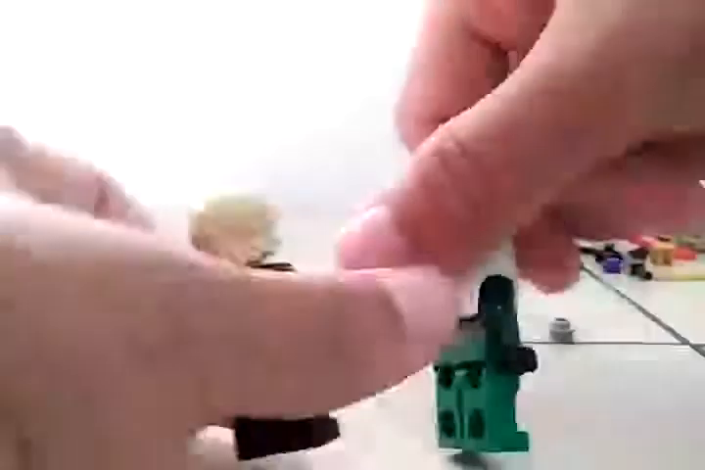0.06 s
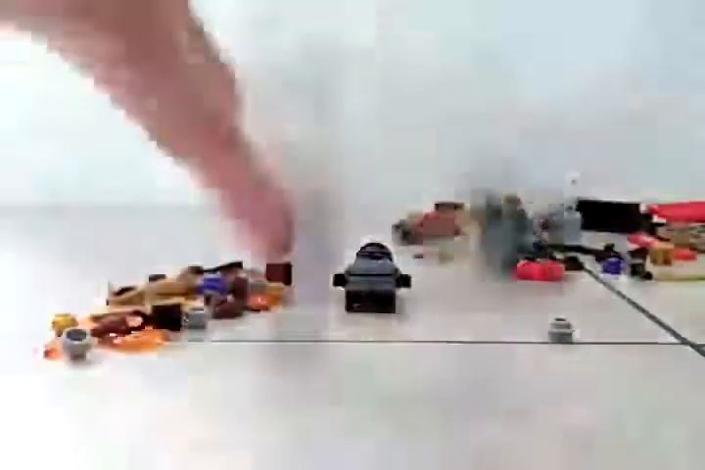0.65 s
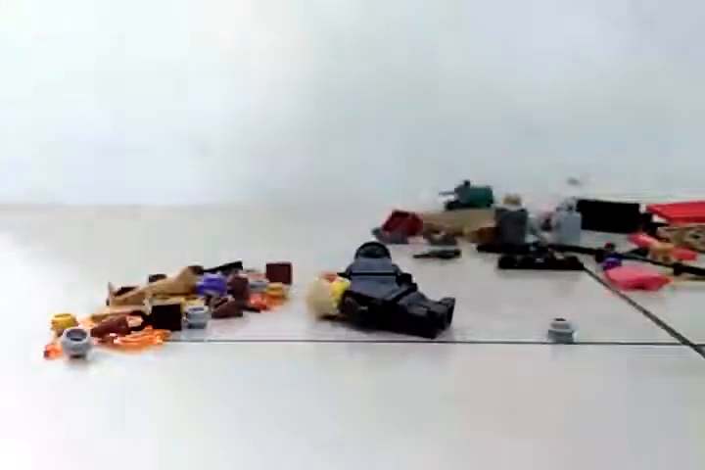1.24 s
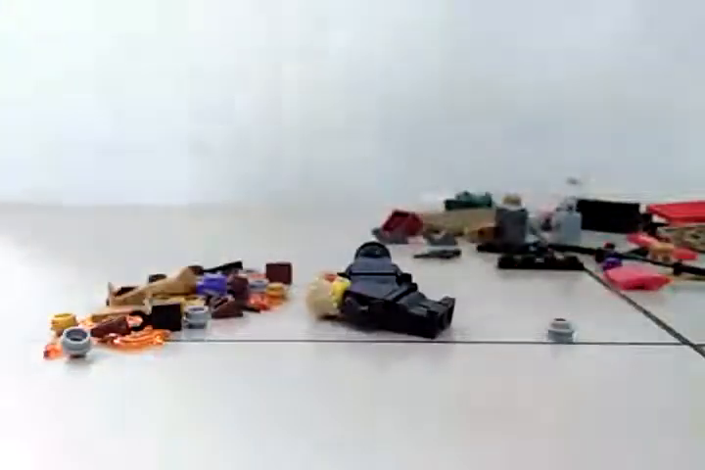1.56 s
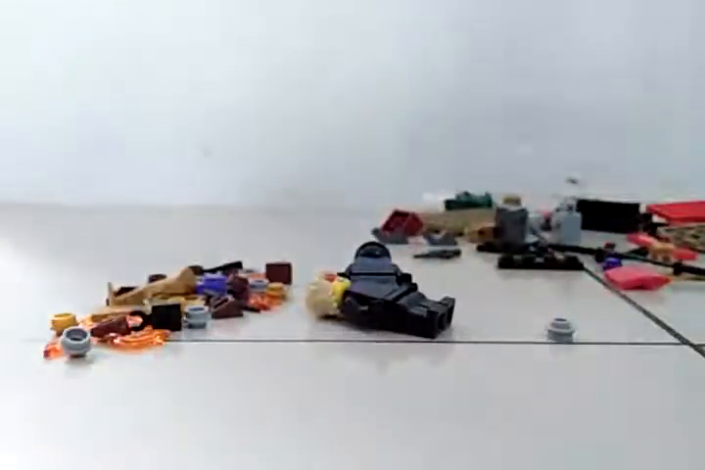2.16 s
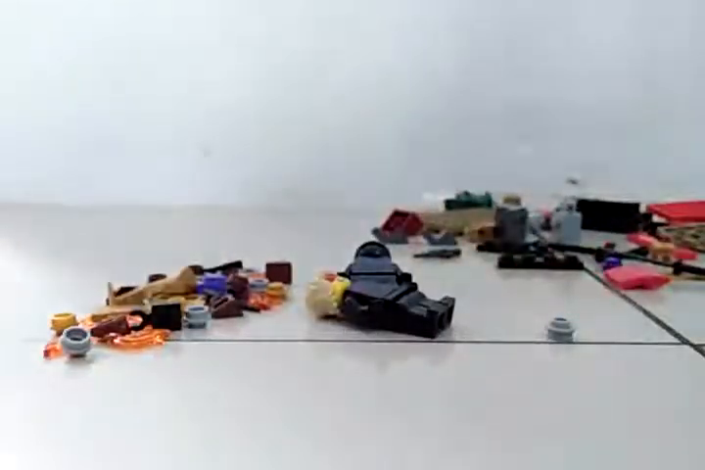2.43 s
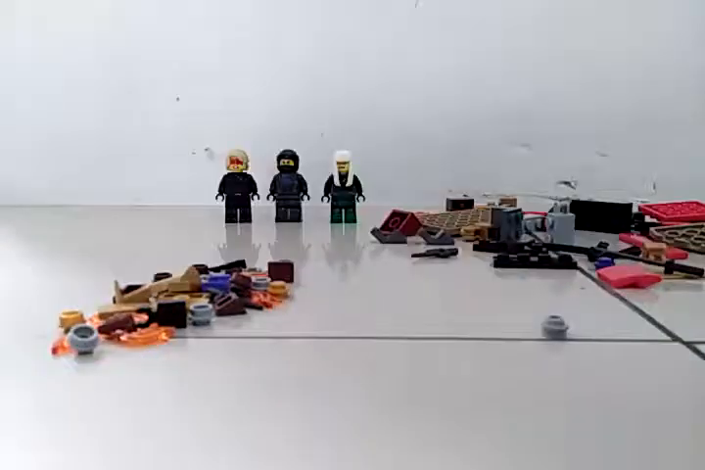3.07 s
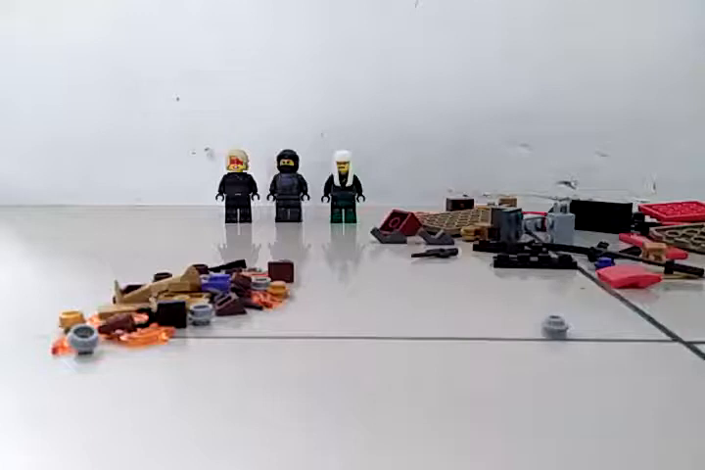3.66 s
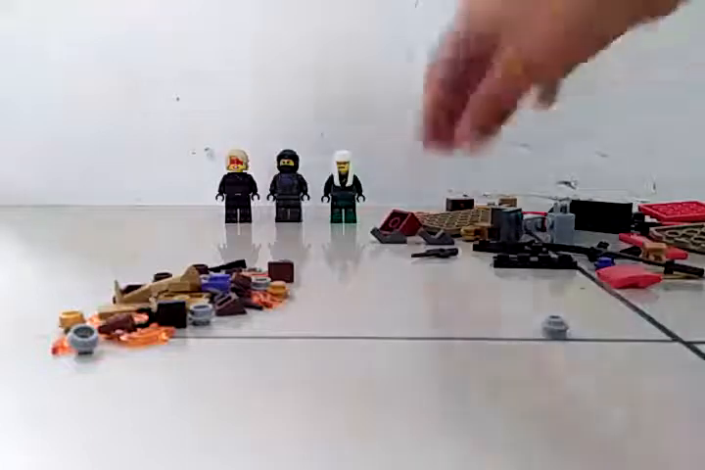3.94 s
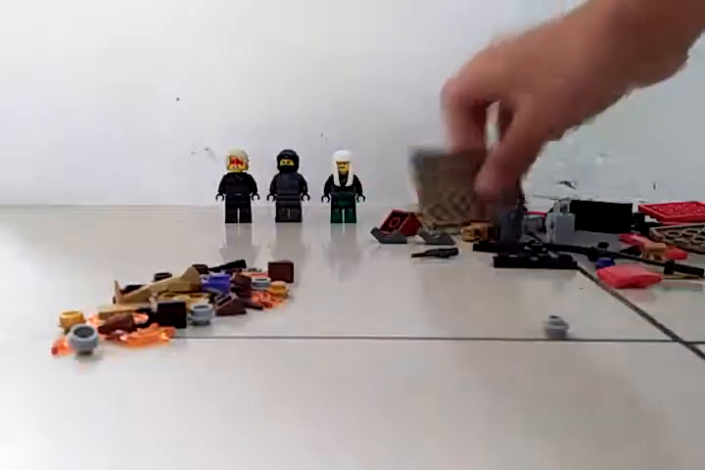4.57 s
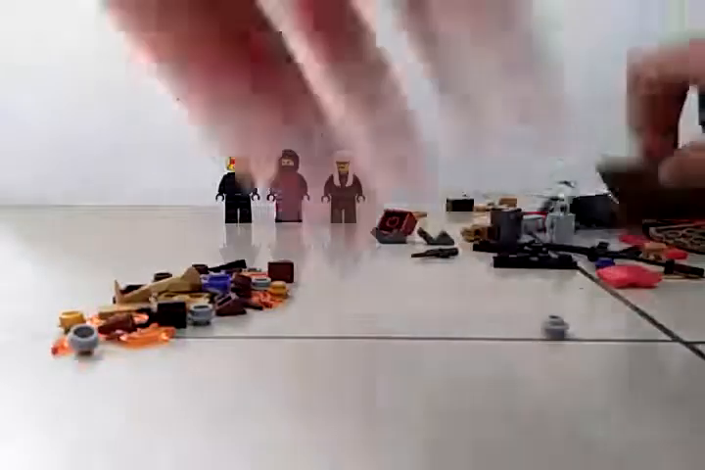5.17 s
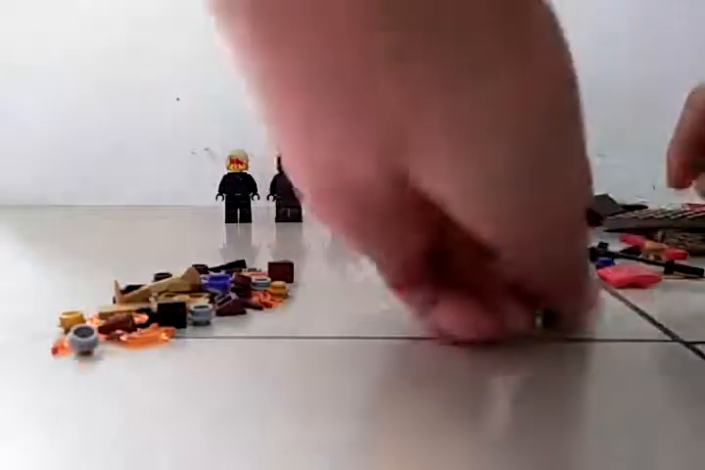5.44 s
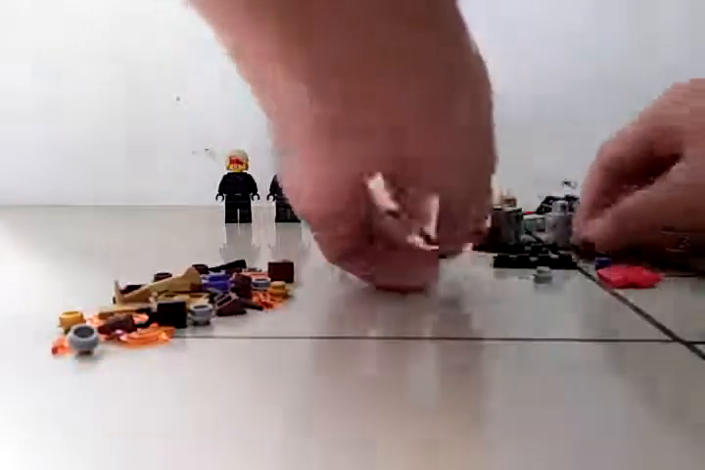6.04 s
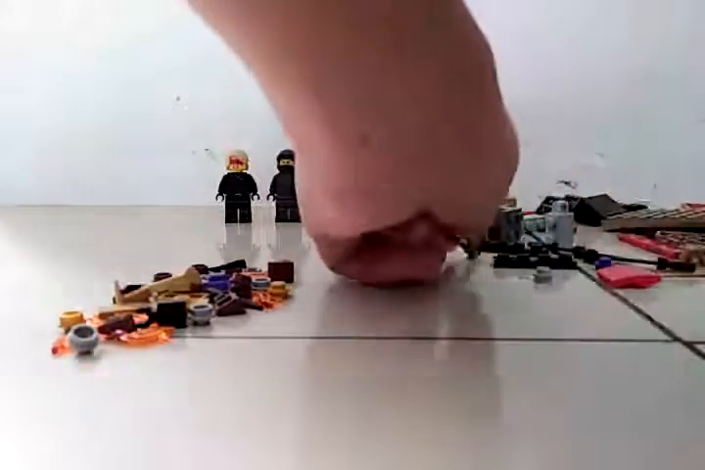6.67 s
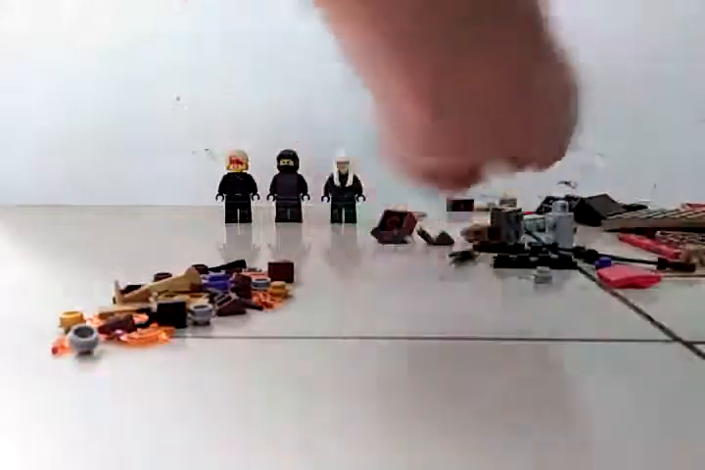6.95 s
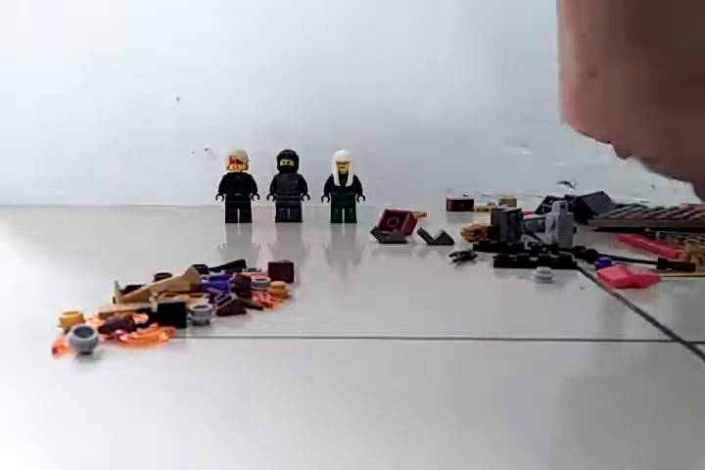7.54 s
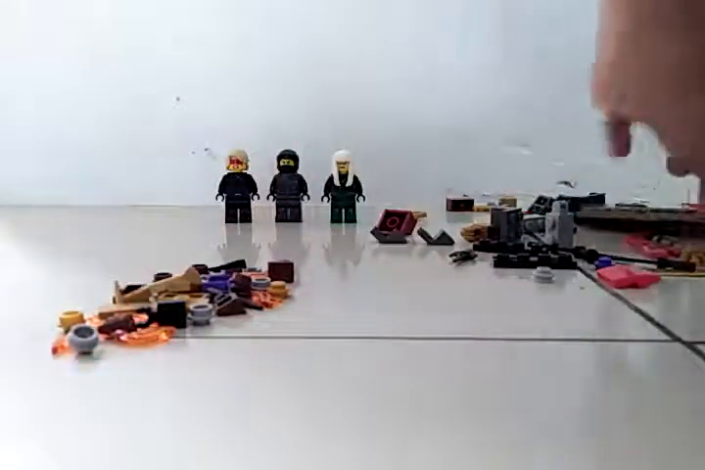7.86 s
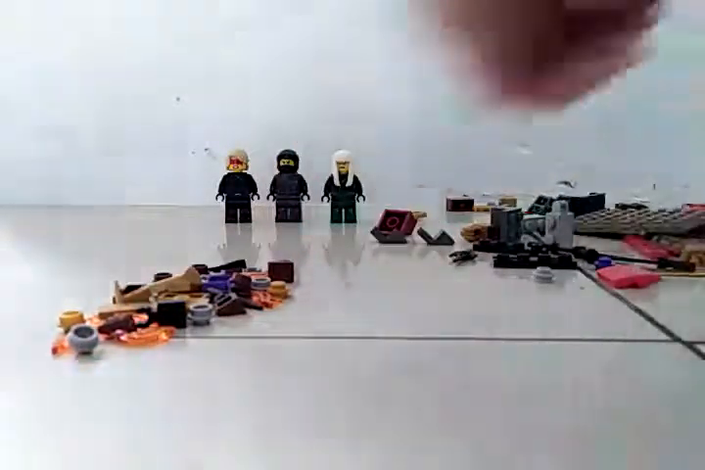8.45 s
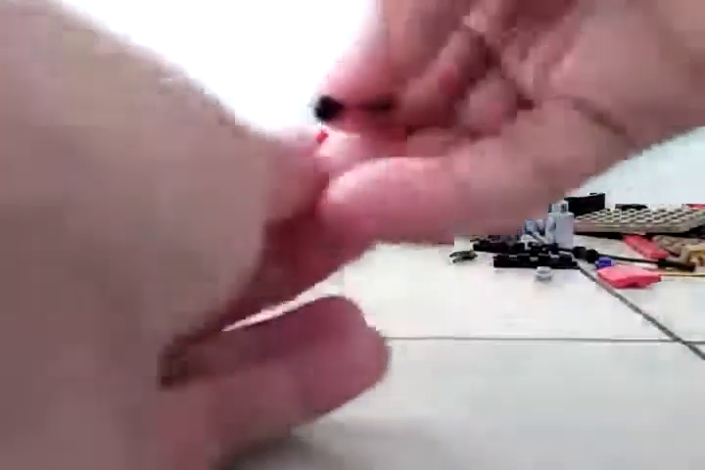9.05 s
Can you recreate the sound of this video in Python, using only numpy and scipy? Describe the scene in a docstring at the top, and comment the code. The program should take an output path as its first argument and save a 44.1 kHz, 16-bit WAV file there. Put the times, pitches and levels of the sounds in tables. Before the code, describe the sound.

A faint low drone fills a bare, tiled room, with the microphone close to a pile of plastic toy bricks. From about 0.4 to 1.4 seconds, figures topple and bricks crack together in a bright clatter, ringing briefly in the room. A faint far-off rush passes near 2.7 seconds, and soft low bumps come and go. Around 3.5 seconds, fingers brush over plastic and a hollow piece taps lightly. A block clicks sharply at 4.2 seconds, then a flat plate scrapes over the tiles from 4.4 to 4.7. Pieces rattle and slide from 5 seconds, peaking in the loudest snap at about 5.4. After a quiet stretch with a few dull bumps, hands rummage from 7.4 seconds with small ticks, clicks and rubs. A long piece is put down with a little bounce at 8.4 seconds, leaving soft bumps and the drone.

```python
"""A bare, hard room with a tiled floor; a phone microphone near a pile of plastic bricks, a low drone behind.
In the first second hands knock toy figures over: each contact is a few milliseconds of chatter that rings
the hollow piece. Soft bumps and brushing fingers follow, and a far-off rush passes. At 4.4 s a flat building
plate scrapes over the tiles and is lifted out of the pile; from 7.4 s the hands rummage, then put a long
piece down. The room rings on behind the clicks; the phone's noise suppressor shortens the bright tails."""
import sys
import numpy as np
from scipy import signal
from scipy.fft import rfft, irfft, next_fast_len
from scipy.io import wavfile
from scipy.ndimage import uniform_filter1d

SR = 44100
rng = np.random.default_rng(int(sys.argv[2]) if len(sys.argv) > 2 else 0)


def dump_mix(stems):
    """Bounce the given channels to the path in sys.argv[1] as a 16-bit WAV at rate SR."""
    frames = np.atleast_2d(stems).T  # one column per channel
    limited = np.clip(frames, -1, 1)  # hard clip at full scale
    pcm = np.round(limited * 32767).astype(np.int16)
    wavfile.write(sys.argv[1], SR, pcm)


N = 410571
TIME = np.arange(N) / SR


def undb(db):
    """Decibels to gain."""
    return 10 ** (np.asarray(db) / 20)


def unit(x):
    """Scale to rms 1."""
    return x / np.sqrt(np.mean(x ** 2) + 1e-30)


def band(x, lo, hi, order=4):
    """Causal band-pass, edges in Hz."""
    sos = signal.butter(order, [lo, min(hi, SR / 2 - 100)], "band", fs=SR, output="sos")
    return signal.sosfilt(sos, x)


def colour(x, points):
    """Shape a spectrum by points of f/Hz, level/dB."""
    hz, db = np.transpose(points)
    size = next_fast_len(N, True)
    f = np.maximum(np.arange(size // 2 + 1) * SR / size, 1)
    return irfft(rfft(x, size) * undb(np.interp(np.log(f), np.log(hz), db)), size)[:N]


def wander(rate_hz):
    """Smooth random drift with a spread near 1."""
    hold = int(SR / rate_hz)
    steps = np.repeat(rng.standard_normal(N // hold + 1), hold)
    return 1.3 * uniform_filter1d(uniform_filter1d(steps, hold), hold)[:N]


def swells(rows):
    """Gain that grows exponentially to each peak and dies away again."""
    return sum(undb(db) * np.exp(-np.maximum((peak - TIME) / rise, (TIME - peak) / fall))
               for peak, rise, fall, db in rows)


def add(track, start_s, sound):
    """Mix a sound into a track."""
    i = int(start_s * SR)
    track[i:i + len(sound)] += sound[:N - i]


# Spectrum of the room tone: f/Hz, level/dB (levels in all tables are relative)
TONE_COLOUR = [(21, -36), (35, -14), (87, -10.5), (180, -4), (214, -17), (297, 1), (374, -19), (437, -7.5),
               (655, -5), (735, -0.5), (874, -6), (944, -2), (1080, -4.5), (1310, -8), (2000, -16.5),
               (3500, -24.5), (4550, -67.5), (7700, -120)]
# Course of the drone: t/s, level/dB
DRONE_LEVEL = [(0.0, -68), (0.31, -68), (1.27, -71), (2.23, -66), (3.08, -65), (3.5, -77.5), (4.38, -78),
               (4.59, -75.5), (5.01, -71), (6.27, -73.5), (6.51, -68), (7.65, -73.5), (8.32, -77.5),
               (8.74, -68.5), (9.31, -78)]
# Surges of rumble: peak t/s, rise/s, fall/s, level/dB
SURGES = [(0.15, 0.24, 0.17, -66.5), (0.4, 0.41, 0.69, -66.5), (2.35, 0.21, 0.1, -72),
          (3.0, 0.53, 0.29, -66.5), (6.48, 0.1, 0.6, -66)]
def room_tone():
    """The room's low background: surging rumble and an uneven drone that flicker together."""
    noise = colour(rng.standard_normal(N), TONE_COLOUR)
    flicker = wander(18)
    rumble = unit(band(noise, 43, 130)) * undb(2.6 * flicker + 2.26 * wander(26))
    drone = unit(band(noise, 150, 420) + 0.51 * band(noise, 300, 320, order=1)) * undb(3.2 * flicker)
    rumble_gain = undb(-80) + undb(-4) * swells(SURGES)
    drone_gain = undb(np.interp(TIME, *np.transpose(DRONE_LEVEL)) - 0.77)
    return rumble_gain * rumble + drone_gain * drone


# Broad swells of the rush: peak t/s, rise/s, fall/s, level/dB
RUSH_SWELLS = [(0.4, 1, 1, -74), (2.6, 0.26, 0.7, -81), (3.25, 0.23, 0.37, -71), (9.2, 0.94, 0.38, -84)]
# Edges of its bands: f/Hz
RUSH_BANDS = [350, 600, 820, 1050, 3800]
def distant_rush(rest_db=-71.5, flicker_db=2.2):
    """A rush far from the microphone that swells and flickers band by band."""
    air = np.zeros(N)
    for lo, hi in zip(RUSH_BANDS, RUSH_BANDS[1:]):
        noise = colour(rng.standard_normal(N), TONE_COLOUR)
        air += band(noise, lo, hi) * undb(flicker_db * wander(15))
    return (undb(rest_db) + swells(RUSH_SWELLS)) * unit(air) * undb(1.6 * wander(9))


# Spells of hum: start t/s, end t/s, level/dB
HUMS = [(0.0, 0.65, -64.5), (2.238, 2.5, -74.5), (6.3, 6.9, -72.5)]
def hum(hz=85, fade_s=0.08):
    """A low, slightly wavering hum comes and goes."""
    tone = unit(np.sin(2 * np.pi * np.cumsum(hz + 0.6 * wander(3.5)) / SR))
    return tone * sum(undb(db) * np.clip(np.minimum(TIME - start, end - TIME) / fade_s, 0, 1)
                      for start, end, db in HUMS)


def ring(modes, detune, crack=0, crack_s=1, size=4096):
    """One tap on a piece: clear modes that differ from spot to spot, and a crack of countless damped ones."""
    hz, db, t60 = np.transpose(modes)[:, :, None]
    t = np.arange(size) / SR
    pitch, strength = rng.standard_normal((len(modes), 2)).T[:, :, None]
    waves = np.sin(2 * np.pi * hz * (1 + detune * pitch) * t) * np.exp(-np.log(1000) * t / t60)
    polarity = rng.choice([-1, 1], (len(modes), 1))
    clear = np.sum(polarity * undb(db + 2 * strength) * waves / np.sqrt(t60), axis=0)
    dense = band(rng.standard_normal(size), 1500, 25000, order=2) * np.exp(-t / crack_s)
    return unit(clear) + crack * unit(dense)


# Edges of the knock, clack, snap and tick registers: f/Hz
REGISTERS = [600, 2400, 7000, 11000, 15000]
# Each piece's share in them: knock/dB, clack/dB, snap/dB, tick/dB
BALANCE_DB = {"brick": (-17.5, -7, 1.5, -9), "plate": (0, -3.5, -2, -9), "beam": (-7.5, -9, 1.5, -4),
              "large brick": (-24.5, -9.5, -1, -3), "block": (-26.5, -8.5, -6, -14.5),
              "hollow": (-12, -10, -21.5, -18), "chip": (-42, -7, 6, 16), "clack": (2.5, -10, -5, -1.5),
              "figure": (-14.5, -16, 0, -3.5), "stud": (-7.5, -1, 0.5, -1.5),
              "slat": (-8, -9.5, 0.5, -14.5)}
DULL_TILT = (1, 0.52, -0.016, -0.17)  # dB in each register for 1 dB of dullness
def blows(kind, hits, modes, detune, crack, crack_s, chatter, build, size=4096):
    """A first contact, then chatter that builds and dies; a flat landing is duller than one on a corner."""
    out, t = np.zeros(N), np.arange(size) / SR
    attack = int(0.008 * SR)
    times, strength, dullness, chatter_times = np.transpose(hits)
    sounds = []
    for chatter_s in chatter_times:
        age = t / chatter_s
        rattle = rng.standard_normal(size) * rng.random(size) * np.exp(-age) * (1 - np.exp(-age / build))
        contact = (t == 0) + chatter * rattle / np.linalg.norm(rattle)
        sounds.append(signal.fftconvolve(contact, ring(modes, detune, crack, crack_s))[:size])
    shaped = 0
    for lo, hi, db, tilt in zip(REGISTERS, REGISTERS[1:], BALANCE_DB[kind], DULL_TILT):
        register = band(np.array(sounds), lo, hi)
        gain = undb(strength + db + tilt * dullness) / register[:, :attack].std(axis=1)
        shaped = shaped + register * gain[:, None]
    for start, sound in zip(times, shaped):
        add(out, start, sound)
    return out


def piece(kind, hits, modes, detune, crack, crack_s, chatter, build, direct_db, room_db, room_detune):
    """Two paths: straight to the microphone, and all round into the room with each mode a cluster of three."""
    direct = blows(kind, hits, modes, detune, crack, crack_s, chatter, build)
    all_round = blows(kind, hits, list(modes) * 3, room_detune, 0.7 * crack, crack_s, 0.59 * chatter, build)
    return np.array([undb(direct_db) * direct, undb(room_db) * all_round])


# Figure blows: t/s, level/dB, dullness/dB, chatter/s
FIGURE_HITS = [(0.4060, -53, 14.5, 0.001), (0.4213, -43, 0, 0.002), (0.4427, -61.5, 23, 0.0026),
               (0.7840, -43, 3.5, .0018), (0.9283, -39, 3, .004)]
# Figure modes: f/Hz, level/dB, t60/s
FIGURE_MODES = [(740, -7, 0.049), (894, 6.5, .055), (1010, -1.5, 0.027), (1910, -5, 0.013),
                (2420, -1, 0.016), (2830, -4.5, .02), (4200, 1, 0.0073), (7000, -12, 0.00814),
                (9590, 15.5, .009), (10600, 1.5, .008), (11550, -0.5, .006)]
def figures():
    """Toy figures tap the tiles and topple."""
    return piece("figure", FIGURE_HITS, FIGURE_MODES, detune=0.042, crack=0.5, crack_s=0.0008,
                 chatter=2.8, build=0.2, direct_db=-2, room_db=-7, room_detune=0.0495)


# Brick blows: t/s, level/dB, dullness/dB, chatter/s
BRICK_HITS = [(0.4183, -41, -14, 0.00028), (0.4345, -53, -17, 0.00093), (0.4835, -60, 13, .002),
              (0.5085, -53, -7, 0.00092), (0.5368, -49.5, -10, 0.0035), (0.8162, -35, -1.5, 0.0023),
              (0.8400, -48, -29, 0.00072), (0.8606, -31, -2, 0.0044), (0.9112, -57, -16, 0.0022),
              (0.9525, -33.5, -3, 0.00037), (1.0104, -47, 3, 0.0078), (1.0186, -40.5, 11, 0.0033),
              (1.0622, -38.5, -18, 0.0029), (1.0743, -43, 6, 0.0025), (1.0795, -53, 1, 0.0012),
              (1.0908, -41, -1.5, 0.0061), (1.1011, -30, -13, 0.0028), (1.2695, -50, 5, 0.00089),
              (1.2939, -49.5, 4, 0.0048), (2.7725, -64.5, -7.5, 0.0009), (2.7855, -63.5, -18, 0.0021),
              (3.9238, -60, 5, 0.00058), (5.2258, -44.5, -7, 0.0042), (5.9779, -75.5, 32, 0.0004),
              (7.4005, -62, 14, 0.0033), (7.4160, -60, 7, 0.004), (7.4485, -58, 12, 0.0053),
              (7.5178, -59.5, 14, 0.0041), (7.7784, -56, -6, 0.0011), (7.8682, -56.5, 7, 0.0041),
              (7.9240, -52, -9, 0.0034), (7.9400, -40, -12, 0.0015)]
# Brick modes: f/Hz, level/dB, t60/s
BRICK_MODES = [(998, -19, .02), (1660, -3.5, 0.016), (2253, -5.5, 0.021), (3097, -5, 0.0076),
               (3866, -6.5, 0.031), (4720, -0.5, 0.012), (5346, 0, 0.004), (5900, -4, 0.0046),
               (7383, -4, 0.0068), (9080, 9.5, 0.009), (9320, 8, 0.017), (9870, 6, 0.013),
               (11720, -0.5, 0.0037), (13535, -6.5, 0.0056)]
# Spells of settling: start t/s, end t/s, level/dB
SETTLING = [(0.442, 0.49, -78), (1.35, 1.447, -60.5), (5.483, 5.556, -53.5)]
def bricks(ticks=4, tick_dull_db=11, tick_chatter_s=0.005, scatter_db=1.5):
    """Bricks crack against each other; loose ones settle in a few small random ticks."""
    hits, slots = list(BRICK_HITS), np.arange(ticks)
    for start, end, db in SETTLING:
        moments = start + (end - start) * (slots + rng.random(ticks) * (slots > 0)) / ticks
        for moment, (louder, duller) in zip(moments, scatter_db * rng.standard_normal((ticks, 2))):
            hits.append((moment, db + louder, tick_dull_db + duller, tick_chatter_s))
    return piece("brick", hits, BRICK_MODES, detune=0.062, crack=1.15, crack_s=0.0004,
                 chatter=0.9, build=0.23, direct_db=-1.5, room_db=-2.5, room_detune=0.051)


# Stud blows: t/s, level/dB, dullness/dB, chatter/s
STUD_HITS = [(0.4995, -51, 4, .002), (7.9460, -48, 2.5, .002)]
# Stud modes: f/Hz, level/dB, t60/s
STUD_MODES = [(1990, -2, 0.022), (2190, 2.5, 0.033), (2798, -6.5, 0.014), (4200, -0.5, .012),
              (6150, 0.5, .02), (9500, -1, .008), (12020, -1, 0.0065)]
def stud():
    """A small stiff piece lands with a crisp tick."""
    return piece("stud", STUD_HITS, STUD_MODES, detune=0.019, crack=0.39, crack_s=0.001,
                 chatter=1.7, build=0.2915, direct_db=-5.5, room_db=-11, room_detune=0.058)


def slips(per_s, spread_db, size=N):
    """Tiny slips at random moments, of very unequal size."""
    moments = rng.random(size) < per_s / SR
    return unit(moments * rng.standard_normal(size) * undb(spread_db * rng.standard_normal(size)))


def rubs(strokes, modes, slips_per_s, grit, detune, spread_db=2.5, spots=3, size=17640):
    """Studs catch and slip over edges at a few ringing spots: a patter that swells and fades with the stroke."""
    out, t = np.zeros(N), np.arange(size) / SR
    for start, end, db in strokes:
        contacts = [slips(slips_per_s / spots, spread_db, size) for _ in range(spots)]
        body = unit(sum(signal.fftconvolve(spot, ring(modes, detune))[:size] for spot in contacts))
        rasp = unit(band(sum(contacts), 3800, 18000, order=1))
        progress = np.clip(t / (end - start), 0, 1)
        force = np.sqrt(np.sin(np.pi * progress).clip(0))
        add(out, start, undb(db) * force * unit(band(body, 600, 11000) + grit * rasp))
    return out


# Sliding strokes of each kind of piece: start t/s, end t/s, level/dB
BRICK_RUBS = [(1.015, 1.06, -50), (1.1, 1.2, -50.5), (1.34, 1.46, -58), (4.23, 4.46, -60),
              (5.35, 5.48, -44.5), (7.84, 7.93, -61.5)]
HOLLOW_RUBS = [(3.462, 3.508, -62.5)]
PLATE_RUBS = [(5.055, 5.19, -51.5), (5.16, 5.245, -46.5), (5.295, 5.375, -43)]
SLAT_RUBS = [(7.452, 7.55, -59), (7.685, 7.77, -54.5), (8.205, 8.29, -56)]
BEAM_RUBS = [(8.356, 8.43, -52)]
def sliding_pieces():
    """Pieces slide against each other in the pile, each ringing with its own modes."""
    return (rubs(BRICK_RUBS, BRICK_MODES, slips_per_s=2900, grit=0.14, detune=0.079)
            + rubs(HOLLOW_RUBS, HOLLOW_MODES, slips_per_s=1900, grit=0.15, detune=0.03)
            + rubs(PLATE_RUBS, PLATE_MODES, slips_per_s=6400, grit=0.18, detune=0.011)
            + rubs(SLAT_RUBS, SLAT_MODES, slips_per_s=2500, grit=0.72, detune=0.016)
            + rubs(BEAM_RUBS, BEAM_MODES, slips_per_s=2500, grit=0.4, detune=0.025))


# Soft low bumps: t/s, peak level/dB
BUMPS = [(1.335, -57.5), (2.669, -53.5), (3.016, -53), (3.056, -56), (3.364, -57), (4.043, -59),
         (4.472, -52), (6.333, -56.5), (6.979, -59), (7.108, -58), (7.214, -59), (7.631, -64), (7.887, -58),
         (8.675, -59), (8.758, -57)]
def body_bumps(decay_s=0.0086, top_hz=224, size=8192):
    """Hands and body shift on the hard floor: slow pushes with no treble."""
    out, age = np.zeros(N), np.arange(size) / SR / decay_s
    for start, db in BUMPS:
        thud = band(rng.standard_normal(size) * age * np.exp(-age), 38, top_hz, order=2)
        add(out, start, undb(db) * thud / np.abs(thud).max())
    return out


# Finger strokes: start t/s, end t/s, level/dB
BRUSHES = [(1.66, 1.76, -61), (3.37, 3.7, -60.5), (3.84, 4.02, -60.5), (4.12, 4.2, -60.5),
           (4.93, 5.01, -61.5)]
def brushing_fingers():
    """Fingers brush softly over plastic: a thin, high patter."""
    patter = rubs(BRUSHES, BRICK_MODES, slips_per_s=4300, grit=0.4, detune=0.25, spread_db=3)
    return band(patter, 4800, 22000, order=1)


# One narrow swell: peak t/s, rise/s, fall/s, level/dB
PASSING_SWELL = [(2.7, 0.36, 0.19, -56.5)]
def passing_rush(centre_hz=730):
    """A far-off rush rises and passes: a narrow core in a broad skirt."""
    core = band(rng.standard_normal(N), centre_hz - 45, centre_hz + 45, order=2)
    skirt = band(rng.standard_normal(N), 450, 1020, order=3)
    return swells(PASSING_SWELL) * unit(unit(core) + undb(-2.5) * unit(skirt))


# Blows on a hollow piece: t/s, level/dB, dullness/dB, chatter/s
HOLLOW_HITS = [(3.3954, -55.5, -14.5, 0.0025), (3.4745, -62, 6, .003), (3.4836, -54, 5.5, 0.0025),
               (3.4912, -55.5, -4, 0.0028), (3.4994, -51, -3, 0.0044), (3.5095, -57, 0, 0.0028),
               (5.0858, -59.5, 2.5, .003), (5.1385, -54.5, 4, 0.0029), (5.2976, -49, -3.5, 0.00083)]
# Its modes: f/Hz, level/dB, t60/s
HOLLOW_MODES = [(1789, 9, 0.034), (1990, 10, 0.026), (2205, -9.5, 0.013), (2574, -2.5, 0.011),
                (2730, -3.5, 0.01), (3530, -11, .004), (5132, -13, 0.027), (9230, -3, 0.013)]
def hollow_piece():
    """A hollow piece is knocked and rings near 2 kHz with hardly any crack."""
    return piece("hollow", HOLLOW_HITS, HOLLOW_MODES, detune=0.029, crack=0.074, crack_s=0.0027,
                 chatter=0.86, build=0.9, direct_db=8.5, room_db=6.5, room_detune=0.054)


# Blows on a held piece: t/s, level/dB, dullness/dB, chatter/s
HELD_HITS = [(3.5170, -48.5, 3.5, .0008), (3.5210, -62.5, 16, 0.00091)]
# Its modes: f/Hz, level/dB, t60/s
HELD_MODES = [(706, -7.5, 0.031), (1006, 8.5, 0.07), (1210, -1.5, 0.02), (1460, -5.5, .016),
              (1770, -2, 0.02), (1940, -8, .02), (2270, -12, .014), (2620, -8.5, .012), (4800, -2.5, .006),
              (9200, -1, .006)]
def held_piece():
    """A piece held in the fingers meets the floor in a dry clack."""
    return piece("clack", HELD_HITS, HELD_MODES, detune=0.012, crack=0.3, crack_s=0.0024,
                 chatter=1, build=0.3, direct_db=-3.5, room_db=-11.5, room_detune=0.1)


# Block blows: t/s, level/dB, dullness/dB, chatter/s
BLOCK_HITS = [(4.1681, -71.5, 28, 0.01), (4.1999, -31.5, 0.36, 0.0023), (4.2076, -35.5, 2.1, 0.00047)]
# Block modes: f/Hz, level/dB, t60/s
BLOCK_MODES = [(1932, -0.5, 0.018), (3240, -2, 0.014), (3361, 2.5, 0.015), (3630, 8.5, 0.026),
               (3570, -4, 0.0062), (4026, 2, 0.012), (5295, 7, 0.011), (6300, 1, 0.016), (7050, -12, 0.013),
               (7870, 1, .01), (8860, 1, 0.0076), (9080, 3.5, 0.013), (9600, 0.5, 0.0037),
               (10775, -14.5, 0.0042)]
def block():
    """A block touches softly, then strikes twice in quick succession."""
    return piece("block", BLOCK_HITS, BLOCK_MODES, detune=0.01, crack=0.29, crack_s=0.0039,
                 chatter=1.6, build=0.87, direct_db=2, room_db=2.5, room_detune=0.074)


# Course of the drag: t/s, hiss level/dB, body level/dB
DRAG_LEVELS = [(4.38, -59.5, -75.5), (4.484, -48, -50), (4.552, -48, -48.5), (4.566, -45.5, -42.5),
               (4.628, -55.5, -60.5), (4.68, -75.5, -63.5)]
# Spectrum of the scrape: f/Hz, level/dB
DRAG_COLOUR = [(88, -37.5), (150, -4.5), (364, -19.5), (433, -3.5), (567, -1), (661, -12), (728, -4),
               (1070, -4), (1200, -8.5), (2020, -4), (4460, -12.5), (5600, -9.5), (6050, -13.5),
               (6600, -12), (7600, -17.5), (8700, -11.5), (9800, -14.5), (11200, -15), (14200, -19),
               (15000, -71)]
def plate_drag(onset_s=0.028):
    """The plate starts to move and scrapes over the tiles: a gritty body under a finer hiss."""
    times, hiss_db, body_db = np.transpose(DRAG_LEVELS)
    moving = np.clip((TIME - times[0]) / onset_s, 0, 1) * (TIME <= times[-1])
    hiss = unit(band(colour(slips(7000, spread_db=2.9), DRAG_COLOUR), 5600, 15000, order=3))
    body = unit(band(colour(slips(3500, spread_db=2.4), DRAG_COLOUR), 110, 3200))
    hiss *= undb(np.interp(TIME, times, hiss_db) + 0.4)
    body *= undb(np.interp(TIME, times, body_db))
    return moving * (hiss + body)


# Plate blows: t/s, level/dB, dullness/dB, chatter/s
PLATE_HITS = [(4.7198, -46.5, -7, 0.0014), (4.7240, -67, 8.5, 0.0079), (5.0562, -48.5, 3, 0.0045),
              (5.0730, -47, -11.5, 0.0039), (5.0850, -59.5, 17.5, 0.0032), (5.1187, -34, -3.5, 0.0026),
              (5.1340, -47.5, -4, 0.0022), (5.1373, -39.5, -5.5, 0.0032), (5.1505, -46, -3, 0.0016),
              (5.1645, -48, 3, .002), (5.2150, -56.5, -10, .004), (5.2745, -49, 5, .004),
              (5.2974, -44.5, 3.5, 0.0013), (5.3230, -55, 0.5, .003), (5.3409, -39.5, 0.5, 0.003),
              (5.3537, -45.5, 0.5, 0.0032)]
# Plate modes: f/Hz, level/dB, t60/s
PLATE_MODES = [(659, -1.5, 0.046), (1030, 3.5, 0.085), (1056, -1, 0.054), (1497, -6, 0.036),
               (1610, -6.5, .025), (1800, -11, 0.013), (2060, -7.5, 0.015), (2670, -3, 0.028),
               (2709, -6.5, .028), (3800, -15, 0.027), (6070, -4, 0.022), (8570, 11, 0.0073),
               (9400, 4, .005), (12400, -2.5, 0.0063)]
def plate():
    """The flat plate knocks and clatters as it is lifted out of the pile."""
    return piece("plate", PLATE_HITS, PLATE_MODES, detune=0.0068, crack=0.3, crack_s=0.00076,
                 chatter=2, build=0.3, direct_db=-2, room_db=-2.5, room_detune=0.01782)


# Blows on a large brick: t/s, level/dB, dullness/dB, chatter/s
LARGE_BRICK_HITS = [(5.3508, -34, -5.5, 0.0027), (5.3538, -31.5, 0, 0.0027), (5.357, -25.5, 2.5, 0.0026)]
# Its modes: f/Hz, level/dB, t60/s
LARGE_BRICK_MODES = [(3000, -10.5, 0.015), (3410, -1.5, 0.022), (4711, 0.5, 0.046), (5510, -3.5, 0.016),
                     (5970, 1.5, 0.0218), (6730, -2.5, 0.0086), (8080, 0.5, 0.012), (8350, -2.5, 0.0059),
                     (9500, 1, .006), (9940, 3.5, 0.0074), (11100, -1, 0.011), (12300, 2.5, 0.0057),
                     (13800, 0, 0.0083)]
def large_brick():
    """Three contacts of a large brick merge into one loud, bright snap."""
    return piece("large brick", LARGE_BRICK_HITS, LARGE_BRICK_MODES, detune=0.0034, crack=0.26,
                 crack_s=0.002, chatter=1.6, build=0.36, direct_db=-1.5, room_db=-4.5, room_detune=0.035)


# Chip blows: t/s, level/dB, dullness/dB, chatter/s
CHIP_HITS = [(6.0045, -65.5, -11.5, 0.0029), (7.5965, -56, 2, 0.0011), (7.6346, -62.5, 15, 0.003),
             (7.8987, -51, 22, 0.0017), (7.9477, -42.5, 27, 0.0041), (8.0099, -56.5, 7, 0.0054),
             (8.103, -66, -16, 0.0011)]
# Chip modes: f/Hz, level/dB, t60/s
CHIP_MODES = [(2140, -4, 0.0087), (2730, -2, 0.0074), (5760, -14, 0.028), (8460, -13, .009),
              (8550, 20, 0.0061), (8850, 5.5, 0.017), (12300, -24, 0.0062), (13600, 7, 0.0063)]
def chip():
    """A chip of plastic chatters in thin, high ticks."""
    return piece("chip", CHIP_HITS, CHIP_MODES, detune=0.0033, crack=0.1, crack_s=0.0019,
                 chatter=6.6, build=0.49, direct_db=-9.5, room_db=-7, room_detune=0.0086)


# Slat blows: t/s, level/dB, dullness/dB, chatter/s
SLAT_HITS = [(7.6958, -46.5, 1.5, 0.0055), (7.7140, -37, -14, 0.0028), (7.7295, -41, -10, 0.0025),
             (7.7440, -48, 2.5, 0.0017), (8.2095, -58, 15, 0.0067), (8.2192, -42.5, -3.5, 0.0063),
             (8.2575, -45.5, -7, 0.0017)]
# Slat modes: f/Hz, level/dB, t60/s
SLAT_MODES = [(1088, -8, 0.064), (1190, -17, 0.045), (1610, -7, .03), (1653, -4, 0.031), (2120, -3.5, .03),
              (3060, -5.5, .045), (3720, -6.5, 0.043), (5330, -2.5, 0.026), (6540, -3, 0.011),
              (7500, -8, 0.0096), (9000, 5.5, 0.005), (9820, -0.5, 0.0066), (13200, -8, .006)]
def slat():
    """A thin slat is nudged and lifted."""
    return piece("slat", SLAT_HITS, SLAT_MODES, detune=0.0048, crack=0.56, crack_s=0.0024,
                 chatter=3, build=0.19, direct_db=-4, room_db=-4, room_detune=0.022)


# Beam blows: t/s, level/dB, dullness/dB, chatter/s
BEAM_HITS = [(8.3615, -38, 0.5, 0.003), (8.3672, -44.5, 8.5, 0.0074), (8.3865, -47, 8, 0.0032),
             (8.4038, -45, -8, 0.0029)]
# Beam modes: f/Hz, level/dB, t60/s
BEAM_MODES = [(1058, 4.5, 0.076), (1547, -3, 0.023), (1660, -5.5, 0.03), (2040, -16, 0.039),
              (2850, 1, 0.015), (3020, 1.5, 0.016), (4770, -3, 0.013), (5400, -3, 0.008), (6370, 4, 0.0074),
              (8500, 5.5, 0.0045), (9060, 0, 0.01), (9900, -2.5, 0.0034), (11000, -10, 0.0035),
              (13300, -6, .006)]
def beam():
    """A long piece is put down and bounces."""
    return piece("beam", BEAM_HITS, BEAM_MODES, detune=0.0051, crack=0.62, crack_s=0.012,
                 chatter=2.6, build=0.13, direct_db=-3.5, room_db=-4.5, room_detune=0.032)


def with_flutter(x, ceiling_m=2.82, sound_m_s=343, trip_db=-16.5):
    """A sound and two echoes between floor and ceiling, losing level and bass on each trip."""
    out, echo = x.copy(), x
    for trip in (1, 2):
        echo = undb(trip_db) * band(echo, 4200, 20000, order=1)
        add(out, trip * 2 * ceiling_m / sound_m_s, echo)
    return out


# Ring of the room: f/Hz, level/dB, t60/s
ROOM_BANDS = [(500, -5.5, 0.69), (996, -1, 0.64), (1900, -2, 0.63), (3180, 1.5, 1.27), (5113, -1.5, 0.88),
              (9690, -1.5, 0.97), (11000, -0.5, 0.58), (14650, -6, 0.46)]
def room(x, wet_db, build_s, size=57344):
    """Diffuse ring of bare walls and tiles: it builds up after the click and lasts longest near 3 kHz."""
    t = np.arange(size) / SR
    hz, db, t60 = np.transpose(ROOM_BANDS)
    f = np.arange(size // 2 + 1) * SR / size
    spectrum, response = rfft(rng.standard_normal(size)), 0
    for share, band_db, decay in zip(np.eye(len(hz)), db, t60):
        noise = irfft(spectrum * np.interp(f, hz, share))
        envelope = np.exp(-np.log(1000) * t / decay) * (1 - np.exp(-t / build_s))
        response = response + undb(band_db) * noise * envelope / np.linalg.norm(envelope)
    return undb(wet_db) * signal.fftconvolve(x, response)[:N]


def scene():
    """Clicks sit centred on the microphone; only the treble of room and scrape spreads to the sides."""
    clicks, all_round = (bricks() + figures() + stud() + held_piece() + slat() + plate()
                         + large_brick() + beam() + block() + hollow_piece() + chip())
    sliding, brushing, scrape = sliding_pieces(), brushing_fingers(), plate_drag()
    into_room = all_round + undb(4.5) * sliding + undb(-4.5) * scrape
    background = room_tone() + distant_rush() + hum() + passing_rush()
    near = with_flutter(clicks) + sliding + brushing + scrape + body_bumps()
    mid = near + room(into_room, wet_db=-4, build_s=0.0076) + background
    wide = room(into_room, wet_db=-10.5, build_s=0.017) + undb(-10) * plate_drag()
    side = band(wide, 6400, 15000, order=6)
    return np.array([mid + side, mid - side])


def noise_suppressor(x, split_hz=2300, threshold_db=-60.5, slope=1.35):
    """The treble is turned down steeply once its own level sinks under the threshold."""
    low = signal.sosfiltfilt(signal.butter(4, split_hz, fs=SR, output="sos"), x)
    treble = x - low
    power = uniform_filter1d(np.mean(treble ** 2, axis=0), size=1024).clip(1e-18)
    return low + treble / (1 + (undb(threshold_db) ** 2 / power) ** slope)


def record(dry):
    """The phone suppresses faint treble, adds a trace of hiss and cuts the top."""
    hiss = undb(-85.5) * rng.standard_normal(N)
    top_cut = signal.ellip(10, 0.2, 70, 14450, fs=SR, output="sos")
    return signal.sosfilt(top_cut, noise_suppressor(dry) + hiss)


dry = scene()
out = record(dry)
dump_mix(out)
```